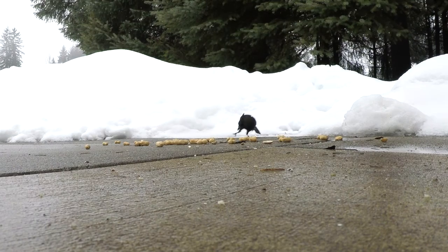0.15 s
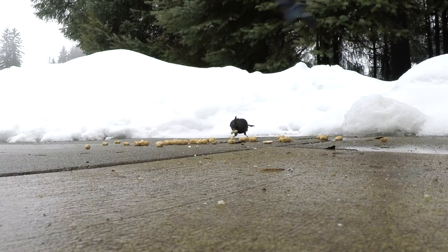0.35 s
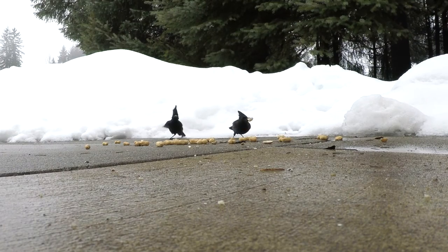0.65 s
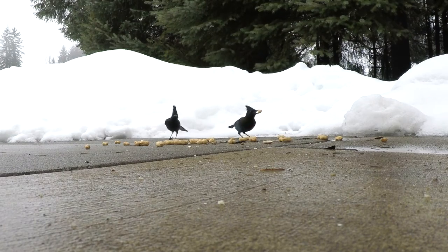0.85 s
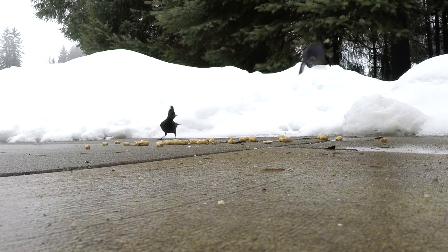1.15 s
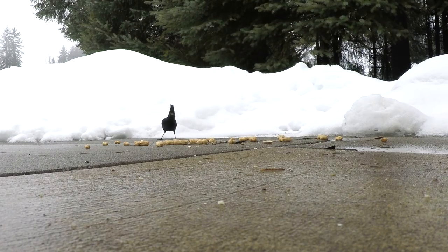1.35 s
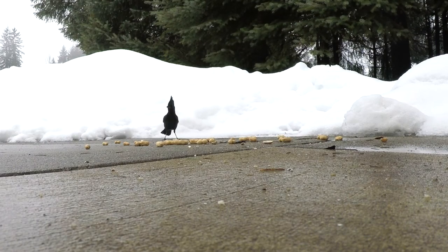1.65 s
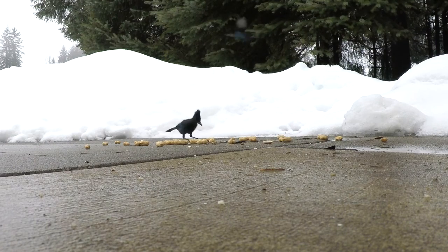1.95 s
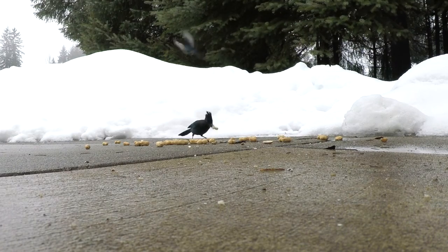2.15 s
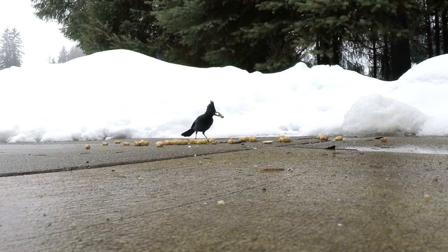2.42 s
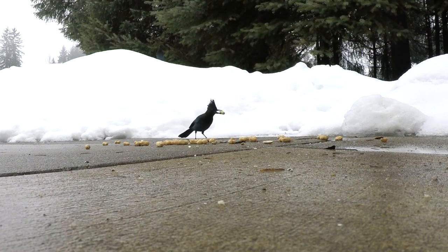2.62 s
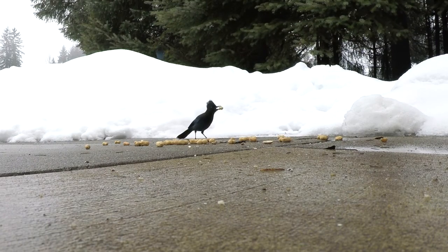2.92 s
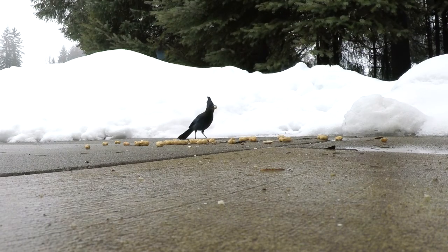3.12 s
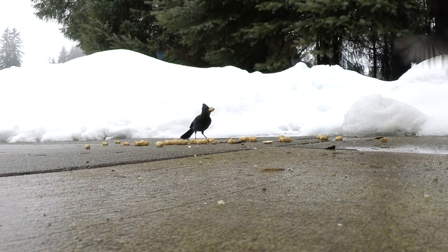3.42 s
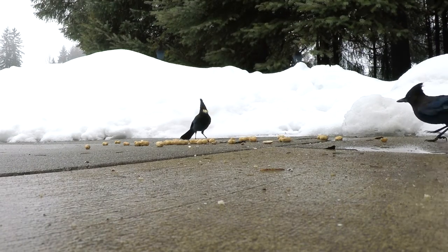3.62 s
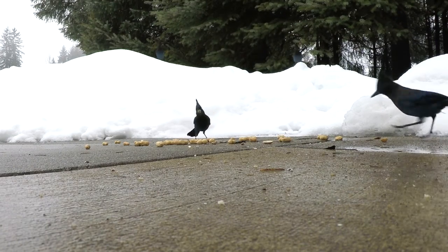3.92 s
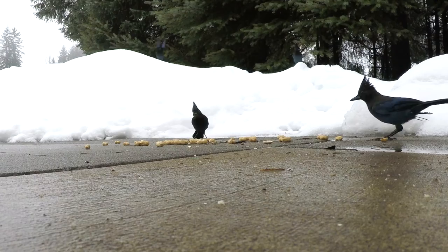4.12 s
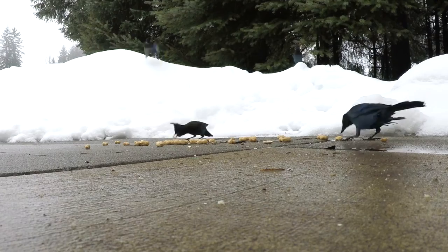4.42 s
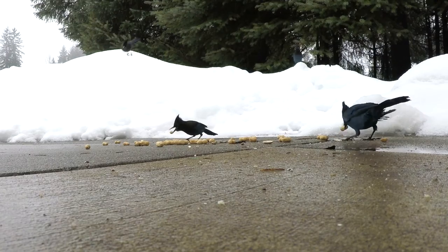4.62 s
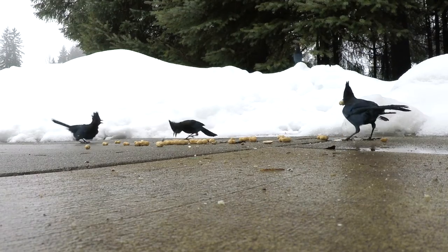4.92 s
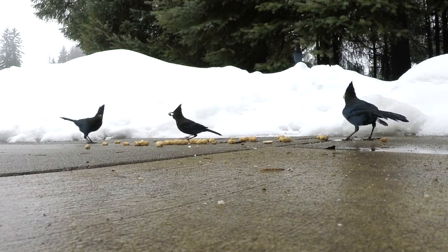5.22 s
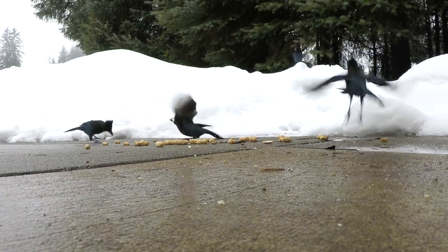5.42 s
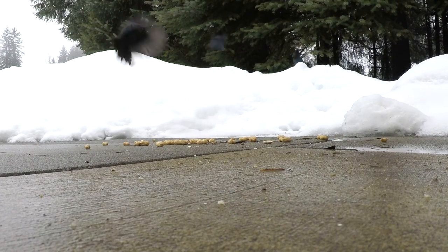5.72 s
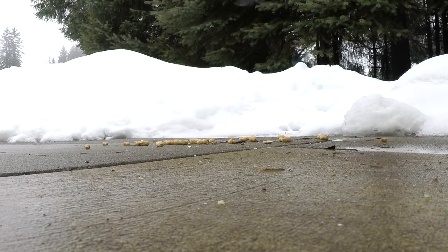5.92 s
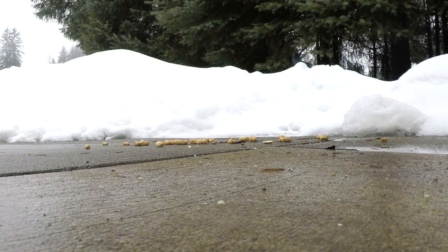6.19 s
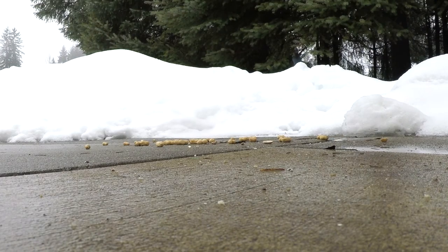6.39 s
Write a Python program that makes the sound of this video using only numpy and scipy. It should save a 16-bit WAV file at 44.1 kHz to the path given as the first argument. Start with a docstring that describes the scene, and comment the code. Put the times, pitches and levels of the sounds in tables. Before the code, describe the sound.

Outdoors by snow and trees, a close microphone picks up jays ticking and pecking at peanuts on wet concrete over soft airy hum and hiss. One bird flutters away early, a faint far songbird whistles, then a near jay rasps three quick scolds and the group bursts off in heavy wingbeats, leaving sparse ticks.

```python
"""Over the low hum and hiss of open air (filtered noise), jays gather peanuts on wet concrete by a snow bank.
Beaks and claws tick (decaying noise bursts), shells knock (damped tones) and grit scrapes (noise swells).
One bird soon flies off (pulsed noise); then a small far songbird whistles (gliding sine tones).
Late on, a close jay scolds three times (two pulsed voices through resonances) and the group takes wing."""
import sys
import numpy as np
from scipy import signal
from scipy.fft import rfft, irfft
from scipy.io import wavfile
from scipy.ndimage import uniform_filter1d

SR = 44100
rng = np.random.default_rng(int(sys.argv[2]) if len(sys.argv) > 2 else 0)


def int16_out(signal):
    """Quantize to a 16-bit WAV file."""
    q = np.round(np.clip(np.atleast_2d(signal).T, -1, 1) * 32767)
    wavfile.write(sys.argv[1], SR, q.astype(np.int16))


N = 288855
TIME = np.arange(N) / SR
BINS = np.fft.rfftfreq(N, 1 / SR)

# open-air spectrum: (frequency [Hz], relative level [dB])
AIR_SPECTRUM = [(59, -68), (100, -38), (118, -27), (131, -4.5), (162, 1), (352, -6.5), (383, -7),
                (443, -8.5), (646, -12.5), (1290, -17), (1730, -17.5), (4940, -26), (7350, -22.5),
                (12200, -29.5), (15000, -44)]
# stereo width of the air: (frequency [Hz], side level against mid [dB])
AIR_WIDTH = [(60, -3), (110, -1), (200, 0.5), (380, 3), (700, 10), (1290, 8), (2380, 0.5), (4400, -4),
             (8120, 2), (15000, -2.5)]
# echoes of the house wall and eaves: (delay [s], relative level [dB])
WALL_ECHOES = [(.0115, -13), (.016, -23), (.027, -37)]
# stereo widening of patio sounds: (frequency [Hz], phase lead of the left channel [rad])
PATIO_PHASE = [(100, -2.5), (340, 0.4), (780, -1.5), (1810, -5.5), (3100, -5), (5250, -7), (11000, -8)]
# level between the channels: (frequency [Hz], left minus right [dB])
PATTER_BALANCE = [(1000, -1), (8000, -1.1)]
TICK_BALANCE = [(1000, -5.0), (8000, -2.5)]
KNOCK_BALANCE = [(1000, -1), (8000, -1)]
SHUFFLE_BALANCE = [(1000, -2), (8000, -2.0)]
WING_BALANCE = [(200, 5.4), (1500, 0.43), (8000, .3)]

# sharpest ticks of beaks, claws, shells and wing tips:
# (time [s], relative body level [dB], relative edge level [dB])
TICKS = [(.1323, -54, -42.5), (.2081, -53, -45), (0.297, -39, -39), (0.4392, -53, -40.5),
         (.6301, -51, -45.5), (0.7462, -50, -40.5), (1.054, -46, -43), (1.1412, -43, -46),
         (1.3608, -54, -44.5), (1.6673, -53, -46), (1.9743, -54, -49), (2.1016, -54, -48.5),
         (2.263, -53, -48), (2.4019, -45, -46), (2.588, -52, -41.5), (2.895, -49, -50), (2.984, -42.5, -57),
         (3.5775, -43, -44.5), (3.7669, -43, -49), (3.816, -52, -44), (4.3293, -53, -44), (4.765, -44, -48),
         (4.8599, -44, -43.5), (4.9318, -47, -43), (5.482, -44, -39), (5.545, -25.5, -25),
         (5.578, -35, -31), (5.669, -43, -35), (5.7246, -36.5, -42), (5.7388, -46, -34), (5.8153, -41, -34),
         (5.8873, -44, -36.5), (6.033, -60, -34), (6.2711, -50, -43.5), (6.4858, -45, -37.5)]
# low body of a tick: (frequency [Hz], relative level [dB])
TICK_BODY = [(500, -8), (1200, 4.5), (1800, -1.5), (2500, -3), (3600, -5), (5000, -10.5), (9000, -27)]
# bright edge of a tick: (frequency [Hz], relative level [dB])
TICK_EDGE = [(2500, -13.5), (4800, -11.5), (6500, 1), (9300, 1.5), (11500, -14), (15000, -26)]
# a middling contact [relative dB]; share of a harder blow, in dB, that goes into the scuff
MIDDLING_TICK_DB, SCUFF_FOLLOWS = -42.5, .45
# hollow knocks of peanut shells: (time [s], frequency [Hz], level [dB])
SHELL_KNOCKS = [(0.2966, 1845, -35.5), (2.402, 1940, -47), (2.984, 1660, -42), (3.377, 2100, -49),
                (3.552, 1490, -43), (4.765, 2216, -47)]
# feet and feathers scraping over grit:
# (time [s], Gaussian half length [s], body level [dB], edge level [dB])
SHUFFLES = [(.299, .003, -38, -50), (1.16, .02, -49, -59), (2.285, 0.015, -57, -52),
            (3.379, 0.0045, -49.5, -49), (3.478, 0.0066, -45, -49), (3.555, 0.013, -50, -50),
            (4.427, 0.017, -56, -51.5), (4.482, .007, -50, -48), (4.769, 0.0059, -46, -50),
            (5.735, 0.02, -49, -50), (5.96, 0.017, -52, -45), (6.367, 0.037, -56, -50)]

# bursts of flapping: (first wingbeat [s], length [s], wingbeat rate [1/s],
# relative thump level [dB], relative swish level [dB], fading [dB/s])
FLIGHTS = [(1.171, 0.45, 13.2, -39, -45.5, 12), (4.961, 0.071, 14, -41, -58, 20),
           (5.389, .16, 12.6, -35.5, -46, 70), (5.526, 0.64, 13.15, -34, -41, 3),
           (5.629, 0.11, 17, -33.5, -44, 9)]
# thump of moved air: (frequency [Hz], relative level [dB])
THUMP_SPECTRUM = [(80, -27), (130, -11), (170, -0.5), (240, 0), (340, -4), (450, -9), (620, -12.5),
                  (800, -22.5), (1500, -30), (3000, -60)]
# the puff after evening out: (frequency [Hz], relative level [dB])
PUFF_SPECTRUM = [(110, -16), (170, -0.5), (270, -2), (450, -4), (650, -3.5), (900, -10), (2000, -28)]
# feather swish: (frequency [Hz], relative level [dB])
FEATHER_SPECTRUM = [(400, -7), (800, 10), (1600, 7.5), (3000, -7.5), (4800, -10.5), (7500, 0),
                    (10000, -2.5), (12000, -31), (15000, -29)]
STROKE_RISE_S, STROKE_FALL_S = 0.0062, 0.0082   # exponential time constants
# the wings lift this share of a beat before each downstroke but a burst's first;
# levels against the downstroke
UPSTROKE_PHASE, UPSTROKE_THUMP_DB, UPSTROKE_SWISH_DB = 0.37, -14, -3
RUSH_DB, HISS_DB, RUSH_RISE_S = -10, -7.5, .04   # rush against thump, hiss against swish
FLIGHT_FADE_S = 0.068   # the last strokes die away over this time
SWISH_FADES_FASTER_DB_PER_S = 7.5   # the feathers' treble is lost sooner as the bird turns away

# one songbird syllable: (time after its start [s], frequency [Hz], relative level [dB])
SYLLABLE = [(0, 4180, -4), (.015, 4800, 11), (.03, 5200, -25), (.045, 5670, 13), (.06, 4400, 2),
            (.085, 3550, 5), (.105, 3220, -8)]
SONG_START_S, SYLLABLE_EVERY_S = 2.365, .1214

# scolds: (time [s], level [dB], pitch factor [1])
SCOLDS = [(4.950, -14, 0.99), (5.082, -15, 0.99), (5.209, -15, 0.96)]
# the two sides of the syrinx, before the pitch factor:
# (time after the scold's start [s], upper voice [Hz], lower voice [Hz])
SYRINX = [(0, 1482, 1431), (.011, 1728, 1556), (.018, 2097, 1579), (.024, 1862, 1531), (.030, 2233, 1630),
          (.036, 2102, 1513), (.044, 2020, 1230), (.052, 1840, 984), (.067, 1255, 692)]
# beak opening: (time after the scold's start [s], gape [0-1])
BEAK_GAPE = [(0, 0.01), (.02, 0.22), (.036, .75), (.052, 0.91)]
# throat and beak resonances: (frequency [Hz], width [Hz],
# relative level with the beak barely open [dB], gain as it opens wide [dB])
THROAT = [(1940, 800, 1, -5.5), (3060, 1040, -6, 6), (3730, 750, -16.5, 18), (6000, 800, 1, -5),
          (6600, 540, 6, -11.5), (7160, 380, -10.5, 10), (9800, 2000, -7.5, -10.5)]
# stereo widening of the scolds: (frequency [Hz], phase lead of the left channel [rad])
SCOLD_PHASE = [(500, 8.5), (1030, 1), (1810, -5.5), (3010, -5.5), (5430, -5.5), (6550, -6), (9730, -4.5)]
# level between the channels for the scolds: (frequency [Hz], left minus right [dB])
SCOLD_BALANCE = [(700, 3), (1290, -12), (1800, 0), (2380, 4.5), (4400, -3), (8120, 0.5)]
# what the surroundings throw back of a scold: (frequency [Hz], gain [dB])
SCOLD_REFLECTION = [(1000, 3.5), (1900, -3), (3000, 1.0), (4600, 3.5), (6200, 2.5), (7500, 6.0)]
# a scold swells, holds and stops; it sags briefly where the lower voice takes over
SCOLD_S, SCOLD_ATTACK_S, SCOLD_RELEASE_S = 0.067, 0.0082, .006
HANDOVER_S, HANDOVER_WIDTH_S, HANDOVER_DB = .036, 0.0065, -3
LOWER_VOICE_DB, LOWER_VOICE_GAIN_DB = -14.5, 35   # relative level at first; gain at its strongest
LOWER_VOICE_PEAK_S, LOWER_VOICE_WIDTH_S = 0.041, .019   # the lower voice swells and ebbs in the scold

# microphone self-noise: (frequency [Hz], relative level [dB])
SELF_NOISE = [(10, -9), (28, -2), (45, -7), (110, -12.5), (1000, -52)]
CUTOFF_HZ = 15000


def from_db(db):
    """Logarithmic level: 20 dB is a tenfold amplitude."""
    return 10 ** (np.asarray(db) / 20)


def rms_one(x):
    """Power normalisation: scale to rms 1."""
    return x / np.sqrt(np.mean(x ** 2) + 1e-20)


def along(rows, t):
    """Linear interpolation: each column of a curve at the times t."""
    s, *columns = np.transpose(rows)
    return [np.interp(t, s, c) for c in columns]


def by_hz(points):
    """Interpolation over log frequency: a table read at every bin."""
    hz, value = np.transpose(points)
    return np.interp(np.log(BINS + 1), np.log(hz + 1), value)


def colour(x, spectrum):
    """Linear filtering by a (Hz, dB) table, keeping the power of white noise."""
    return irfft(rfft(x) * rms_one(from_db(by_hz(spectrum))), N)


def noise(spectrum):
    """Spectral shaping of white noise, at about rms 1."""
    return colour(rng.standard_normal(N), spectrum)


def drift(hz, size=N):
    """Low-passed random fluctuation of rms 1."""
    sos = signal.butter(2, hz, fs=SR, output="sos")
    settled = signal.sosfilt(sos, rng.standard_normal(size + SR))[SR:]
    return rms_one(settled)


def swell(s, rise_s, fall_s):
    """Exponential growth and decay about a peak of 1 at time s."""
    out = np.zeros(N)
    near = slice(max(int((s - .06) * SR), 0), int((s + .25) * SR))
    t = TIME[near] - s
    out[near] = np.exp(np.minimum(t / rise_s, -t / fall_s))
    return out


def gate(t, length_s, attack_s, release_s):
    """Linear envelope: attack, hold and release, all within the length."""
    return np.clip(np.minimum(t / attack_s, (length_s - t) / release_s), 0, 1)


def resonate(x, hz, width):
    """Two-pole resonance: gain near 1 at its peak."""
    r = np.exp(-np.pi * width / SR)
    zeros = [(1 - r * r) / 2, 0, (r * r - 1) / 2]
    poles = [1, -2 * r * np.cos(2 * np.pi * hz / SR), r * r]
    return signal.lfilter(zeros, poles, x + 1e-18)


def place(x, phase, balance):
    """Stereo widening: left and right channels differ in phase and level by frequency."""
    half = np.exp(.5j * by_hz(phase)) * from_db(by_hz(balance) / 2)
    return irfft(rfft(x) * np.array([half, 1 / half]), N)


def patio(x, tail_db, t60, echo_db):
    """Reflection and scattering: a few wall echoes and a diffuse decay from snow and trees."""
    t = TIME[:SR // 2]
    decay = from_db(-60 * t / t60) * np.clip(t / 0.011, 0, 1)
    scatter = rng.standard_normal((2, len(t))) * decay
    response = from_db(tail_db) * rms_one(scatter) / np.sqrt(len(t))
    for s, db in WALL_ECHOES:
        arrivals = (SR * (s + rng.uniform(0, .0005, 2))).astype(int)   # one per channel
        response[[0, 1], arrivals] += from_db(db + echo_db)
    return signal.fftconvolve(x[None], response, axes=1)[:, :N]


def air(level_db=-50.0, flicker_db=0.9):
    """Mid-side superposition: wide outdoor hum and hiss wander a little in level."""
    mid = noise(AIR_SPECTRUM)
    side = irfft(rfft(noise(AIR_SPECTRUM)) * from_db(by_hz(AIR_WIDTH)), N)
    pair = from_db(level_db) * (mid + side * [[1], [-1]])
    hum = signal.sosfiltfilt(signal.butter(2, 1500, fs=SR, output="sos"), pair)
    hiss = pair - hum
    return hum * from_db(flicker_db * drift(11.6)) + hiss * from_db(flicker_db * drift(17))


def patter(per_s=18, level_db=-32.5, spread_db=3):
    """Random impulse train: faint ticks of claws and dripping melt water."""
    strength = from_db(level_db + spread_db * np.clip(rng.standard_normal(N), -2, 2))
    clicks = (rng.random(N) < per_s / SR) * strength
    out = colour(clicks, TICK_EDGE) + from_db(-9) * colour(clicks, TICK_BODY)
    return place(out, PATIO_PHASE, PATTER_BALANCE) + patio(out, tail_db=1, t60=.09, echo_db=4)


def ticks(crack_db=6, scuff_db=-6, crack_s=0.0005, scuff_s=0.011):
    """Impact and friction: a sharp crack in a grainy scuff of shell and grit; harder blows are cleaner."""
    out = 0
    for column, spectrum in enumerate([TICK_BODY, TICK_EDGE], 1):
        crack = scuff = 0
        for row in TICKS:
            s, db = row[0], row[column]
            crack = crack + from_db(db + crack_db) * swell(s - .0004, 0.0002, crack_s)
            dulled_db = MIDDLING_TICK_DB + SCUFF_FOLLOWS * (db - MIDDLING_TICK_DB)
            scuff = scuff + from_db(dulled_db + scuff_db) * swell(s, 0.0037, scuff_s)
        grain = rng.standard_normal(N) * from_db(1.3 * drift(570))
        out = out + colour((crack + scuff) * grain, spectrum)
    return place(out, PATIO_PHASE, TICK_BALANCE) + patio(out, tail_db=-7.0, t60=0.21, echo_db=-2.5)


def knocks(ring_s=0.0036):
    """Damped free vibration: a pecked shell rings for a few cycles at its own pitch."""
    out = 0
    for s, hz, db in SHELL_KNOCKS:
        tone = np.sin(2 * np.pi * hz * (TIME - s))
        out = out + from_db(db) * swell(s, 0.00087, ring_s) * tone
    return place(out, PATIO_PHASE, KNOCK_BALANCE) + patio(out, tail_db=-10, t60=.2, echo_db=0)


def shuffles(grain_db=3):
    """Sliding friction: a gritty scrape swells and fades, in the same colours as the ticks."""
    out = 0
    for column, spectrum in enumerate([TICK_BODY, TICK_EDGE], 2):
        level = 0
        for row in SHUFFLES:
            level = level + from_db(row[column]) * np.exp(-.5 * ((TIME - row[0]) / row[1]) ** 2)
        out = out + level * rms_one(noise(spectrum) * from_db(grain_db * drift(200)))
    return place(out, PATIO_PHASE, SHUFFLE_BALANCE) + patio(out, tail_db=-7, t60=.2, echo_db=-2)


def flight(start, length, per_s, thump_db, swish_db, fading_db):
    """Periodic modulation: even beats fade as a bird leaves; envelopes of puff, swish, rush and hiss."""
    beats = np.arange(0, length, 1 / per_s)

    def strokes(lead_s):
        return sum(swell(start + s - lead_s, STROKE_RISE_S, STROKE_FALL_S) for s in beats if s >= lead_s)

    down, up = strokes(0), strokes(UPSTROKE_PHASE / per_s)
    flown = np.clip(TIME - start, 0, length)
    near = from_db(-fading_db * flown) * np.clip((length - flown) / FLIGHT_FADE_S, 0, 1)
    thump = near * from_db(thump_db)
    swish = near * from_db(swish_db - SWISH_FADES_FASTER_DB_PER_S * flown)
    stirred = np.clip((TIME - start) / RUSH_RISE_S + .5, 0, 1)
    return [thump * (down + from_db(UPSTROKE_THUMP_DB) * up),
            swish * (down + from_db(UPSTROKE_SWISH_DB) * up),
            thump * from_db(RUSH_DB) * stirred,
            swish * from_db(HISS_DB) * stirred]


def wings():
    """Aerodynamic noise: strokes shove puffs of air and swish feathers; stirred air rushes throughout."""
    # birds add in power
    push, swish, rush, hiss = np.linalg.norm([flight(*row) for row in FLIGHTS], axis=0)
    puff = noise(THUMP_SPECTRUM)
    even = puff / np.abs(signal.hilbert(puff))   # a stroke is one even push
    puff = rms_one(colour(even, PUFF_SPECTRUM))
    feathers = np.hypot(swish, hiss) * noise(FEATHER_SPECTRUM) * from_db(2.0 * drift(260))
    out = push * puff + rush * noise(THUMP_SPECTRUM) + feathers
    return place(out, PATIO_PHASE, WING_BALANCE) + patio(out, tail_db=-7, t60=0.51, echo_db=2.5)


def songbird(level_db=-68.5, fading_db=3, count=8):
    """Frequency modulation: far, thin whistles rise, then fall, wavering in level through the trees."""
    out = np.zeros(N)
    hz, db = along(SYLLABLE, TIME[:int(SYLLABLE[-1][0] * SR)])
    for s in SONG_START_S + SYLLABLE_EVERY_S * np.arange(count):
        waver = 1 + 0.013 * drift(200, size=len(hz)) + 0.0198 * drift(19.3, size=len(hz))
        turns = np.cumsum(hz * waver) / SR
        start = int(s * SR)
        out[start:start + len(hz)] += from_db(db + level_db) * np.sin(2 * np.pi * turns)
    out = out * from_db(fading_db * drift(40))
    return out + patio(out, tail_db=-5, t60=.4, echo_db=-3)


def scold(pitch, jitter=0.032, waver=0.02, sharpness=2.32, rasp=0.33, coupling=3.2, hiss_db=-36):
    """Nonlinear coupling: two membranes pulse one air stream, so sum tones sound; one slides far down."""
    t = TIME[:int(SCOLD_S * SR)]
    gape, = along(BEAK_GAPE, t)

    def bump(peak_s, width_s):
        return np.exp(-((t - peak_s) / width_s) ** 2)

    lower_db = LOWER_VOICE_DB + LOWER_VOICE_GAIN_DB * bump(LOWER_VOICE_PEAK_S, LOWER_VOICE_WIDTH_S)
    envelope = gate(t, SCOLD_S, SCOLD_ATTACK_S, SCOLD_RELEASE_S)
    envelope = envelope * from_db(HANDOVER_DB * bump(HANDOVER_S, HANDOVER_WIDTH_S))
    pulses = []
    for hz in along(SYRINX, t):
        unsteady = 1 + jitter * drift(713, size=len(t)) + waver * drift(81, size=len(t))
        turns = np.cumsum(pitch * hz * unsteady) / SR
        pulses.append(np.exp(sharpness * (np.cos(2 * np.pi * turns) - 1)))
    upper, lower = pulses
    lower = lower * from_db(lower_db)
    flow = upper + 1.04 * lower + coupling * upper * lower
    rough = flow * (1 + rasp * rng.standard_normal(len(t)))
    pressure = np.diff(rough, prepend=flow[0])
    # the opening beak moves the weight from the lowest resonance up to the middle ones
    voice = 0
    for k, (hz, width, db, open_db) in enumerate(THROAT):
        gain = from_db(db + open_db * gape + 2.13 * drift(66, size=len(t)))
        voice = voice + (-1) ** k * gain * resonate(pressure, hz, width)
    voice = signal.sosfilt(signal.butter(2, [1300, 8000], "band", fs=SR, output="sos"), voice)
    voice = signal.sosfilt(signal.butter(12, 10300, fs=SR, output="sos"), voice)
    voice = voice / np.sqrt(uniform_filter1d(voice ** 2, size=70) + 1e-12)   # even out the level
    return (voice + from_db(hiss_db) * rng.standard_normal(len(t))) * envelope


def jay():
    """Frequency-dependent reflection: three quick harsh calls come back mostly by their bright part."""
    out = np.zeros(N)
    for s, db, pitch in SCOLDS:
        call = from_db(db) * scold(pitch)
        start = int(s * SR)
        out[start:start + len(call)] += call
    thrown = irfft(rfft(out) * from_db(by_hz(SCOLD_REFLECTION)), N)
    return place(out, SCOLD_PHASE, SCOLD_BALANCE) + patio(thrown, tail_db=-10, t60=0.31, echo_db=0.5)


def scene():
    """Superposition: all sources add."""
    return air() + patter() + ticks() + knocks() + shuffles() + wings() + songbird() + jay()


def record(dry, low_cut_hz=135, self_noise_db=-78):
    """Band limiting: a steep wind filter, faint low self-noise, and the top cut."""
    out = signal.sosfilt(signal.butter(8, low_cut_hz, "high", fs=SR, output="sos"), dry)
    out = out + from_db(self_noise_db) * noise(SELF_NOISE)
    return signal.sosfilt(signal.ellip(10, .3, 80, CUTOFF_HZ, fs=SR, output="sos"), out)


dry = scene()
out = record(dry)
int16_out(out)
```